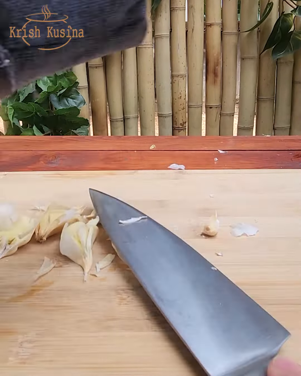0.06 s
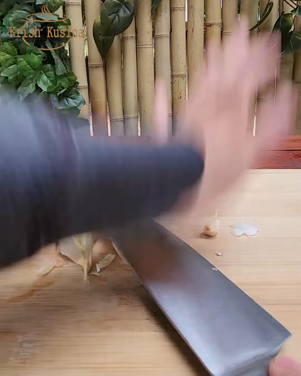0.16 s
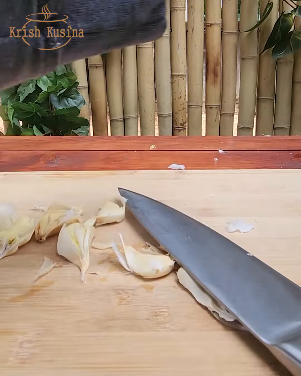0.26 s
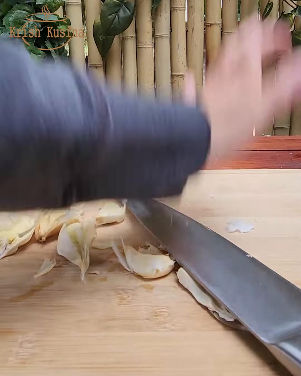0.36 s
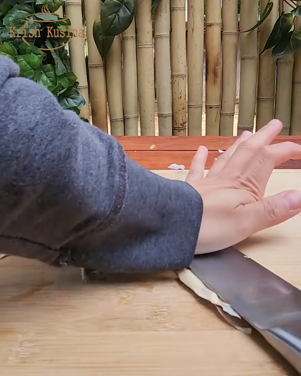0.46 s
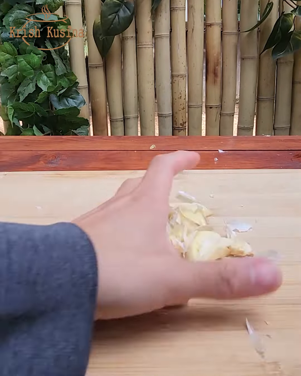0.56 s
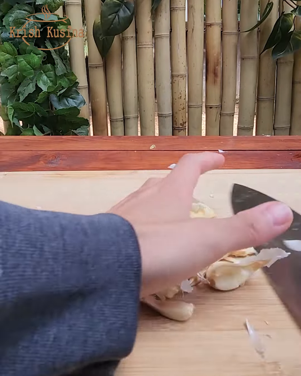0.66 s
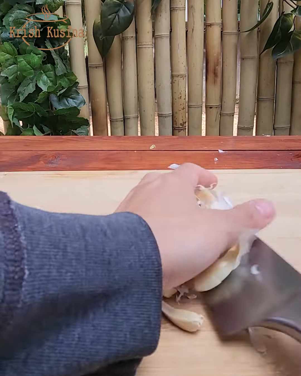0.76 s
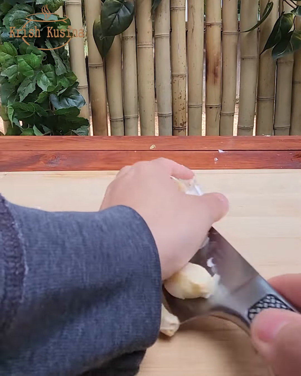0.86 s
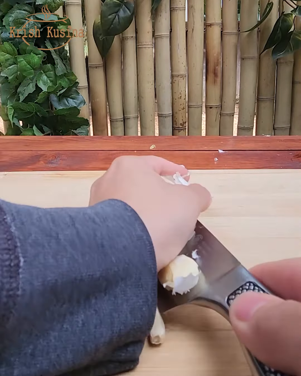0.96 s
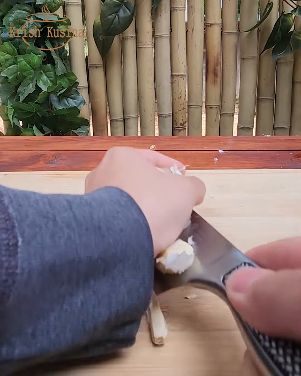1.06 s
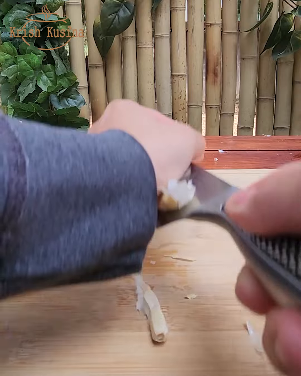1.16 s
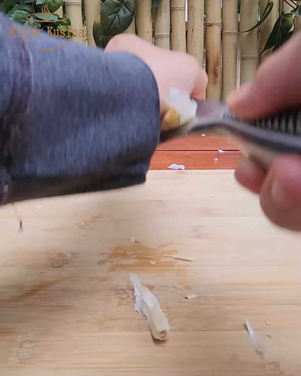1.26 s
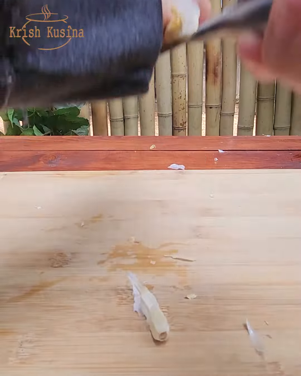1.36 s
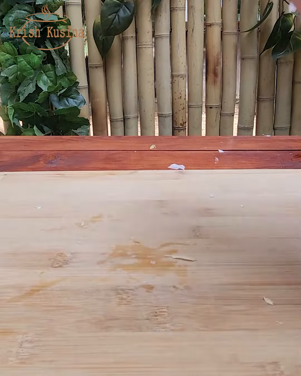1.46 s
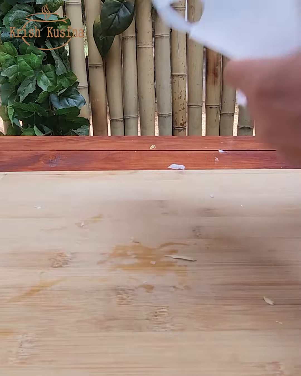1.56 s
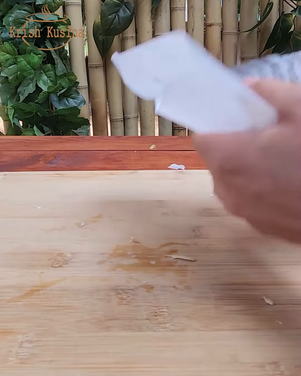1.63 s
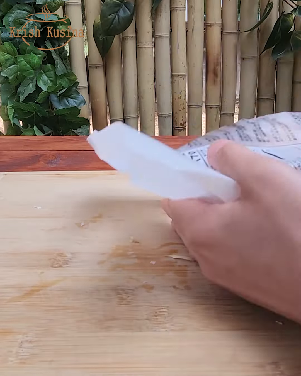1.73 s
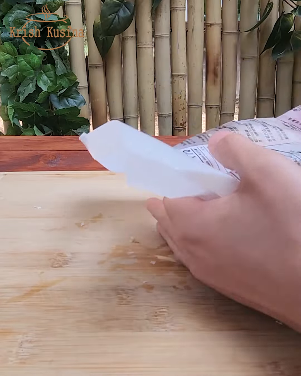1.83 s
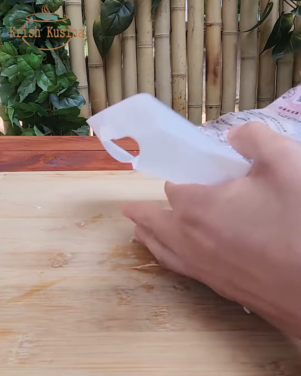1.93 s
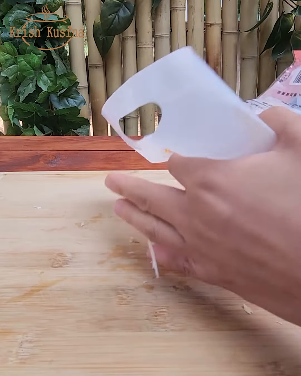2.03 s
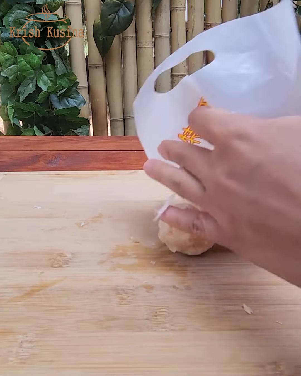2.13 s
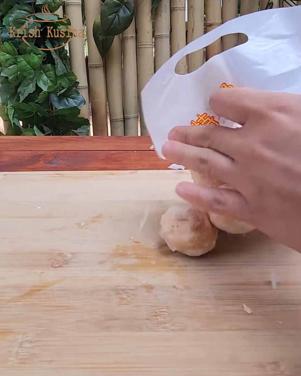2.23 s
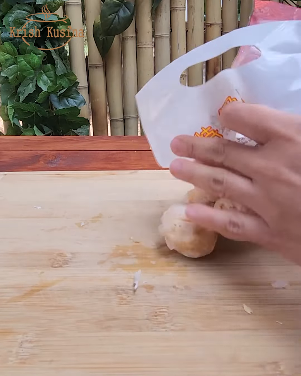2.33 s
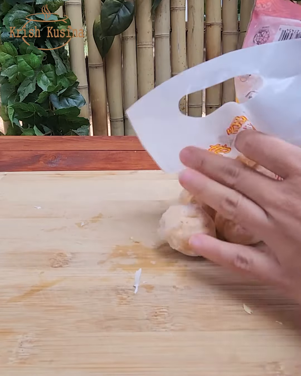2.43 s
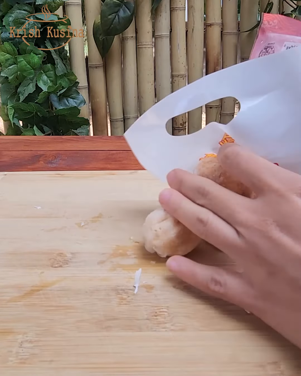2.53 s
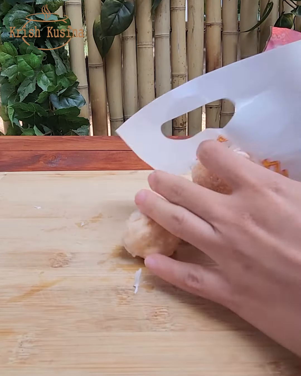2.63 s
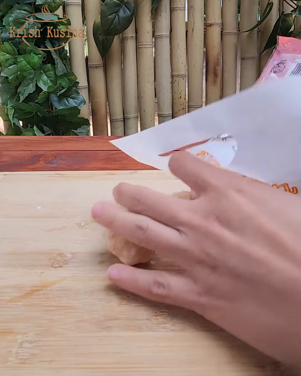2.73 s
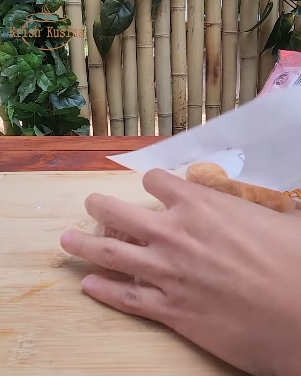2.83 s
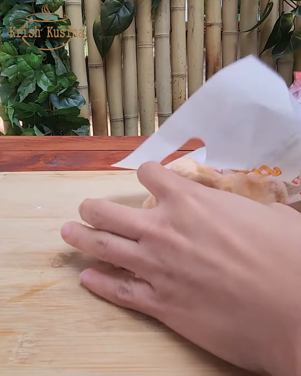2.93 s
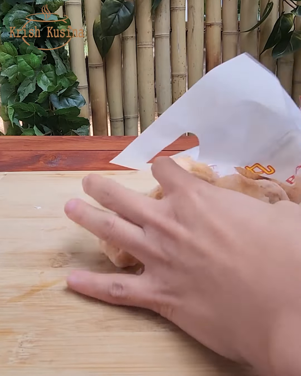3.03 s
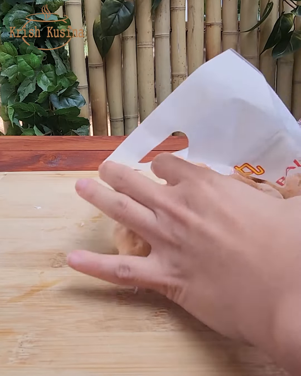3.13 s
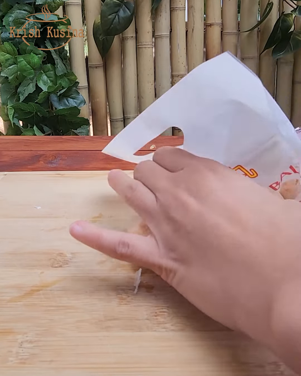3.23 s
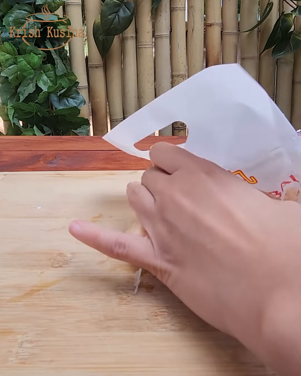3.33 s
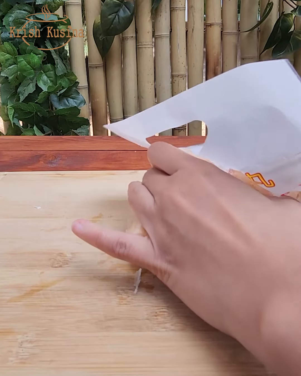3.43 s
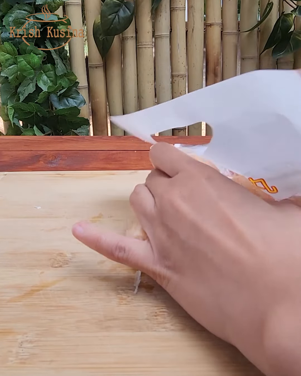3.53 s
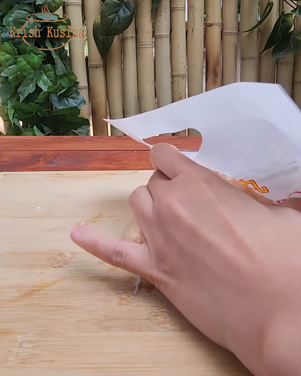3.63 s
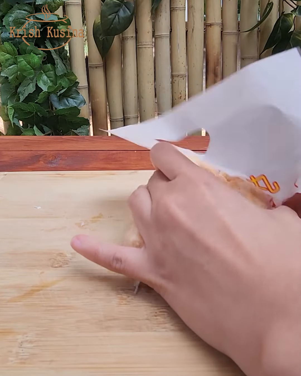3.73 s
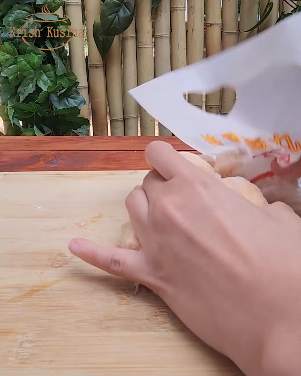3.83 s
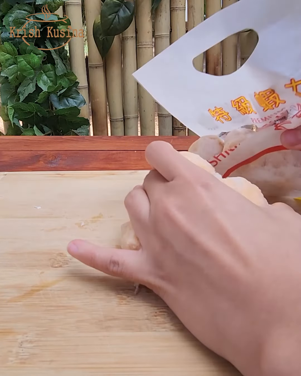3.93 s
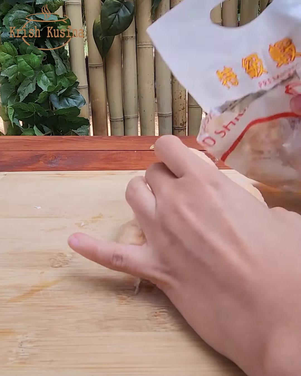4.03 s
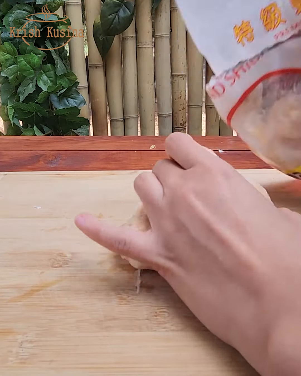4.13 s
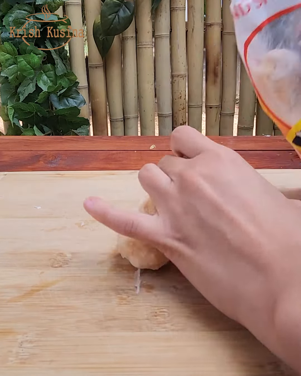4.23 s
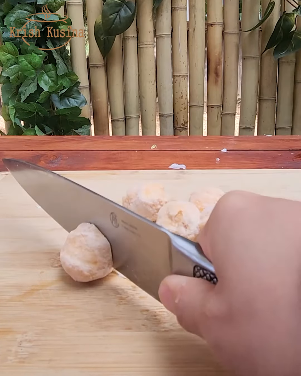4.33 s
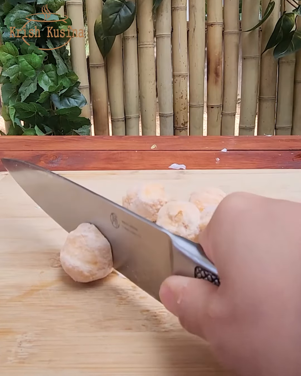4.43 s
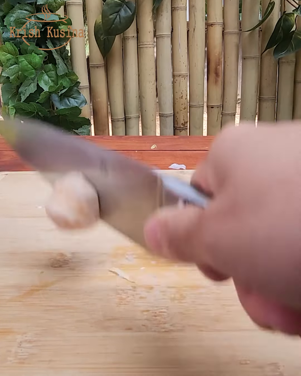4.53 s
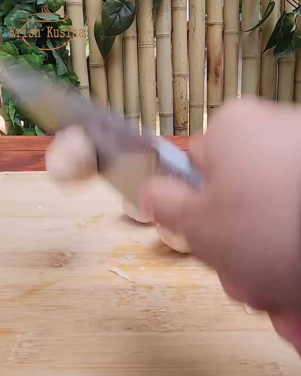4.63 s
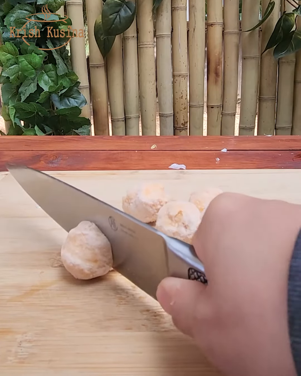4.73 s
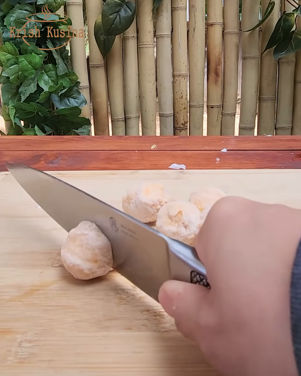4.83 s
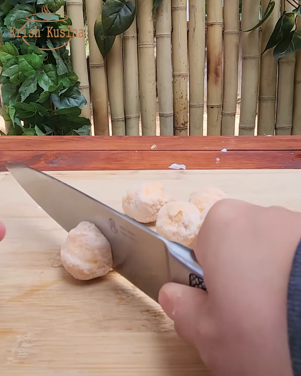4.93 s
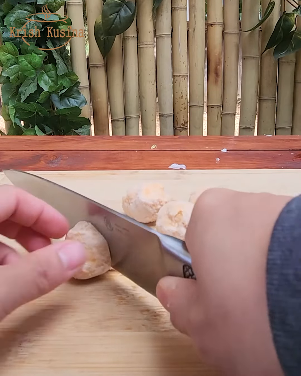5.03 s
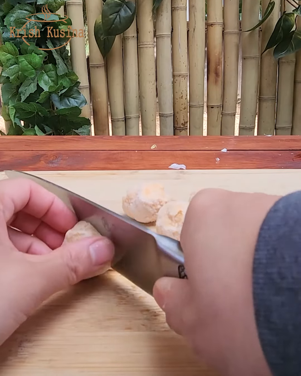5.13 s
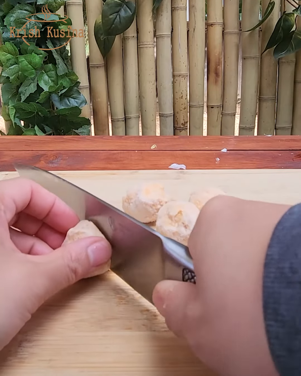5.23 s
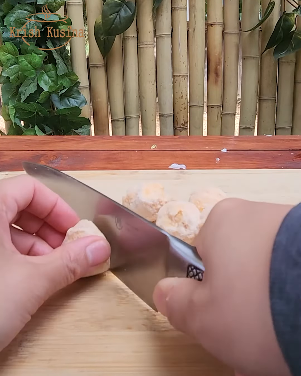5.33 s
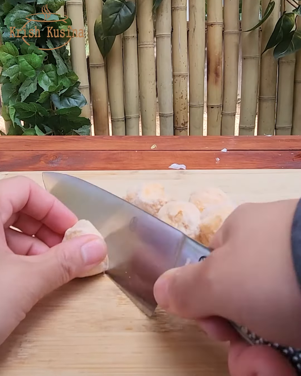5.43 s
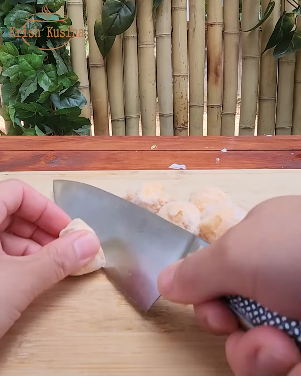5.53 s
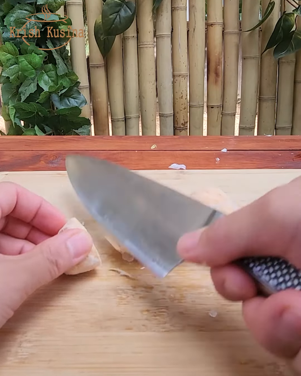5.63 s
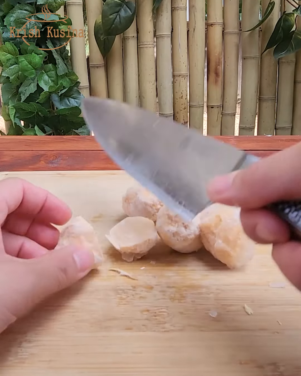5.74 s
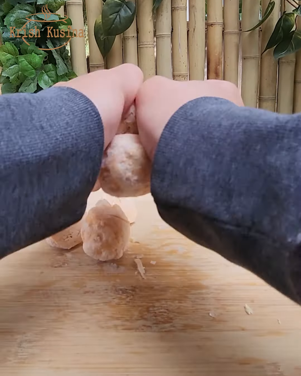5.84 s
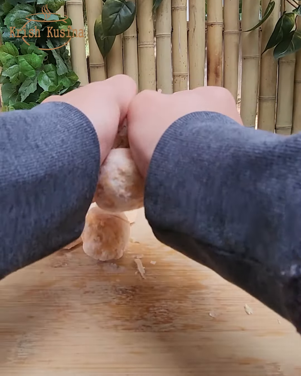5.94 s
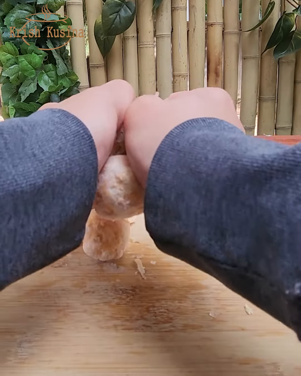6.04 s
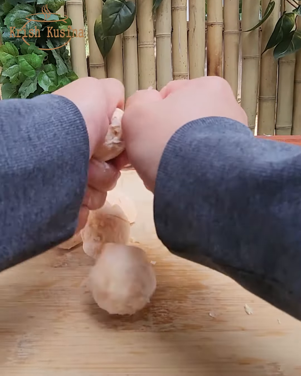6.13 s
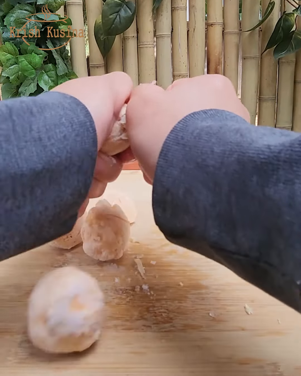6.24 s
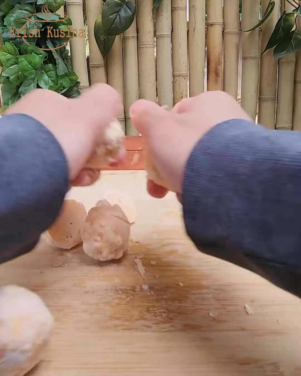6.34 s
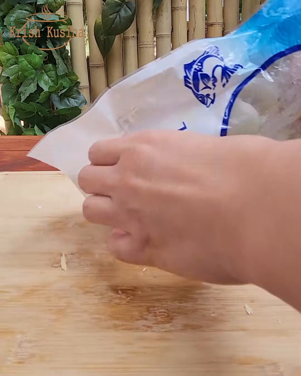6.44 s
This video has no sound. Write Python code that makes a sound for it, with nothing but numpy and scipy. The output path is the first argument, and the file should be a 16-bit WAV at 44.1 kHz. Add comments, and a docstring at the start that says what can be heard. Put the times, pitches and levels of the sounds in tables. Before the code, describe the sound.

Close-miked stereo in a small, dry kitchen, with faint room hum and low rumble. A brief crush opens the scene; at 0.2 s a hard knock cracks garlic on a wooden board with a deep table thud and gritty crunch, followed at 0.4 s by a second, pulpier smash that trails to 0.6 s. Dry, papery skins scrape unevenly with a hollow ring, fading by about 1.2 s. From 1.5 to 4.4 s a thin plastic bag crinkles in irregular swells and sharp single snaps, busiest near 1.7 and 3.75 s, with dull tumbling bumps around 2.4, 4.0 and 4.35 s. It stops abruptly and the rumble drops. A bright chop lands at 4.7 s with light brushing; a faint cut follows at 5.4 s. A steady hiss enters at 5.9 s, a small crack at 6.1, then a loud, dry knock at 6.15 and a lighter bump near 6.5.

```python
"""A knife knocks on a wooden board: blows ring the board's modes, and noise bursts crush and crack garlic.
Garlic is smashed twice and scraped up; its papery skins rustle as noise grains of hollow, ringing colour.
A crinkly plastic bag is shaken out in swelling noise grains and single snaps; mushrooms tumble out and
are chopped, heard as further blows and crushes. Short, filtered-noise reflections make a small, dry kitchen.
Under it lie room air with a low hum, a low rumble and, near the end, a steady hiss."""
import sys
import numpy as np
from scipy import signal
from scipy.fft import rfft, irfft
from scipy.io import wavfile
from scipy.ndimage import uniform_filter1d

SR = 44100
rng = np.random.default_rng(int(sys.argv[2]) if len(sys.argv) > 2 else 0)


def output_pcm(signal):
    """Save a mono or channel-first signal as 16-bit PCM at the path in sys.argv[1].

    Samples are clipped to [-1, 1] before scaling.
    """
    pcm = np.clip(np.atleast_2d(signal).T, -1, 1) * 32767
    wavfile.write(sys.argv[1], SR, np.round(pcm).astype(np.int16))


N = 286209
T = np.arange(N) / SR   # time axis [s]

# Levels are relative within each source; spectra are scaled to unit power.
# Blows on the board: t/s, level/dB, contact cut-off f/Hz, board ring level/dB, table thud level/dB
BLOWS = [(0.1909, -13, 1900, -32, -13.5), (0.2155, -22, 1500, -29, -100), (0.3748, -41.5, 900, -15, -100),
         (0.404, -22, 260, -31, -100), (0.4083, -43, 1500, -8, -20.5), (2.405, -26.5, 915, -28, -43),
         (4.0362, -32, 600, -37, -48), (4.3520, -26.5, 1500, -35, -40), (4.6842, -13, 3954, -33, -38.5),
         (5.4378, -32, 1450, -34, -63.5), (6.1511, -8.5, 2700, -42, -44), (6.273, -45.5, 430, -24, -58),
         (6.473, -31, 2120, -38, -39)]
# Modes of the board: f/Hz, level/dB, decay time T60/s
BOARD_MODES = [(397.8, -1.5, 0.11), (493, -1.5, 0.12), (557, -5, 0.044), (624, -10.5, 0.089),
               (817, -1, 0.062), (1012, -1, 0.041), (1270, 0, 0.071), (1740, 0, 0.056), (2050, -3, .12),
               (2364, -4.5, 0.1)]
# Spectrum of the knock: f/Hz, density level/dB (per Hz)
KNOCK_SPECTRUM = [(60, -9), (550, -6.5), (1200, -1.5), (1900, -1), (3000, -1), (16000, -8)]
# Crisp breaks of garlic skin and flesh: t/s, level/dB, length/s
CRACKS = [(0.188, -21, 0.0016), (0.19, -13, 0.0013), (0.4048, -17, 0.0055), (0.4078, -10, 0.0026),
          (0.882, -39.5, 0.0017), (5.003, -57, 0.002), (6.082, -23, 0.0015)]
# Blade crushing a clove or mushroom: start t/s, end t/s, level/dB, fall/(dB/s), treble tilt/(dB/octave)
SMASHES = [(0.0, 0.059, -25.5, 345, -0.1), (0.189, 0.245, -17, 95, -1.1), (0.241, 0.288, -19, 398, -0.5),
           (0.414, 0.471, -27, 75, 0.2), (0.467, 0.6, -31, 292, -0.5), (5.416, 5.435, -45, 120, -1.2)]
# Spectrum of the crushed pulp: f/Hz, density level/dB (per Hz)
PULP_SPECTRUM = [(59, -22), (100, -7.5), (330, -4.5), (570, -4.5), (736, -11), (1700, -15.5), (3700, -16.5),
                 (11900, -24.5), (16000, -24)]
# Resonances of the blade: f/Hz, width/Hz, level/dB
BLADE_RESONANCES = [(555, 40, -1.5), (950, 53, 10), (1847, 86, 8.5), (3420, 250, -1.5), (5500, 200, 2.5)]
# Uneven push of the scraped skins: t/s, level/dB
SCRAPE_PUSH = [(0.584, -37.5), (0.612, -33.5), (0.66, -38), (0.757, -34.5), (0.82, -41.5), (0.93, -49.5),
               (0.98, -58), (1.199, -72.5)]
# Fingers, sleeve and blade brushing over the food: t/s at the height, level/dB, build-up and release/s
BRUSHES = [(1.43, -67.5, 0.058), (4.718, -42.5, .06), (5.13, -66.5, 0.041), (5.393, -59, 0.091),
           (5.508, -59, 0.022), (5.791, -61, 0.19), (6.464, -43, 0.031)]
# Spectrum of the dry skins: f/Hz, density level/dB (per Hz)
SKIN_SPECTRUM = [(250, -15), (500, -4), (780, -22), (1050, -5.5), (2400, -5), (4400, -7.5), (6200, -1.5),
                 (9000, -8.5), (16000, -1.5)]
# Peaks that give the rustle a hollow, ringing colour: f/Hz, level/dB
RUSTLE_PEAKS = [(500, 8), (1050, 6), (1660, 13), (2380, 12), (2830, 10), (3260, 10), (3750, 10), (5560, 8)]
# Tugs and shakes of the bag: t/s at the height, crinkle level/dB, build-up/s, release/s,
# treble level/dB (higher when the film is taut)
TUGS = [(1.555, -34.5, .14, 0.12, 1.5), (1.685, -24, 0.096, 0.21, -3.5), (1.796, -21, 0.23, 0.041, -9.5),
        (2.011, -27.5, 0.18, .13, -4.5), (2.245, -33.5, 0.24, 0.049, -1), (2.409, -31, 0.21, 0.063, -2),
        (2.499, -29, 0.11, 0.68, -4), (2.73, -32, 0.38, 0.42, -2), (2.94, -36.5, 0.1, 0.059, -5),
        (3.23, -37, 0.095, 0.076, 2), (3.336, -32, 0.07, 0.17, -4.5), (3.436, -30, .12, 0.048, -19),
        (3.514, -36, .008, 0.086, 0.5), (3.603, -32, 0.011, 0.062, -8), (3.72, -25, .13, 0.22, -7.5),
        (3.796, -26, 0.1, 0.12, -3.5), (4.076, -28.5, 0.27, 0.096, -8), (4.178, -23.5, 0.12, 0.18, -6),
        (4.354, -26.5, 0.018, 0.14, -7)]
# Big creases of the bag snapping through: t/s, level/dB
SNAPS = [(1.5554, -20), (1.6734, -21), (1.6861, -19), (1.7153, -21), (1.7907, -15.5), (2.008, -25.5),
         (2.0449, -21), (2.2371, -22), (2.298, -28), (2.3434, -31), (2.3794, -24.5), (2.4069, -19.5),
         (2.4958, -22.5), (2.7357, -18.5), (2.772, -31), (3.0398, -32), (3.2251, -19), (3.299, -32),
         (3.327, -26), (3.3569, -22), (3.4325, -20.5), (3.512, -26), (3.5217, -24.5), (3.548, -22.5),
         (3.6737, -26), (3.7097, -20.5), (3.7414, -19.5), (3.7549, -16.5), (3.7704, -34), (3.846, -19.5),
         (3.8664, -22.5), (3.95, -21.5), (3.9676, -19.5), (4.129, -28), (4.3773, -25)]
# Spectrum of the plastic film: f/Hz, density level/dB (per Hz)
FILM_SPECTRUM = [(59, -35), (100, -4.5), (415, -1.5), (595, -5), (970, 0), (1870, 0), (2370, -3.5),
                 (2990, -1.5), (7140, -7.5), (10900, -13), (11900, -10), (15000, -10.5), (16000, -19)]
# Papery note of the crumpled film: f/Hz, width/Hz, level/dB
FILM_RESONANCE = [(2110, 494, 3)]
# Brief dips in the level of all sources but the background: from t/s, until t/s
DIPS = [(0.287, 0.372), (4.394, 4.65)]
# Spectrum of the still room: f/Hz, density level/dB (per Hz)
AIR_SPECTRUM = [(20, -18.5), (50, -2), (90, -6.5), (135, -2), (210, -15.5), (350, -19.5), (800, -20.5),
                (2000, -34.5), (5000, -52), (16000, -50)]
# Low hum as a peak in the room air: f/Hz, width/Hz, level/dB
HUM_RESONANCE = [(131, 18, 9)]
# Spectrum of the low rumble: f/Hz, density level/dB (per Hz)
RUMBLE_SPECTRUM = [(20, -23.5), (45, 6), (80, -3), (130, -12), (250, -17.5), (800, -47.5)]
# Spectrum of the late hiss: f/Hz, density level/dB (per Hz)
HISS_SPECTRUM = [(60, -19), (140, -4.5), (300, -8.5), (900, -13.5), (1400, -21), (3500, -18), (5600, -14),
                 (9100, -20), (16000, -15.5)]
# Peaks in the late hiss: f/Hz, width/Hz, level/dB
HISS_PEAKS = [(500, 32, 7), (672, 32, 11)]

RUSTLE_PEAK_WIDTH_HZ = 110
WAVER_SHARE, WAVERS_PER_S = .02, 9   # the ringing pitches waver by up to this share
SWELL_RANGE_DB = 21.5   # a stroke rises this much over its build-up and sinks as much over its release
BAG_FROM_S, BAG_UNTIL_S = 1.487, 4.393   # the bag is in the hand
HELD_DB, HELD_TREBLE_DB = -69.5, -8.5   # its crinkle between tugs, and the treble relative to that
CRINKLE_SPREAD_DB, CRINKLE_BED_DB = 4, -7.5   # size spread of the buckles; film rubbing under them
FACET_DB, FACET_T60_S = -20, 0.0042   # drive and decay of a snapped facet's ring
FACET_HZ, FACET_SPREAD_OCTAVES = 2050, .6   # facets differ in size
DIP_DB = -14
EARLY_T60_S, EARLY_SPLIT_HZ = 0.14, 2040   # early decay of the kitchen below the split
TREBLE_DIES_FASTER = 1.2   # ratio of the early decay rate above the split to that below
LATE_DB, LATE_T60_S, LATE_CUT_HZ = -28.5, .52, 3400   # late tail of the kitchen
AIR_DB = -58
# a low rumble is stronger up to 4.39 s, then drops and rises again steadily
RUMBLE_DB, RUMBLE_DROPS_S, DROPPED_DB, RUMBLE_RISE_DB_PER_S = -49.5, 4.39, -70.5, 8.5
HISS_FROM_S, HISS_DB = 5.888, -47
CUTOFF_HZ = 16000


def blows(chatter_s=0.0055, chatter_db=-15, tick_db=-33, thud_hz=80, thud_t60=0.16):
    """Impact excitation: each blow knocks, chatters and rings the board; the table under it thuds."""
    out, t = np.zeros((2, N)), T[:SR // 2]
    click = np.tile(t == 0, (2, 1)) * 1.
    thud = pan(ring(click, thud_hz, thud_t60), left_db=9.5)
    for s, level_db, contact_hz, ring_db, thud_db in BLOWS:
        chatter = amp(chatter_db) * noise(0, size=len(t)) * np.exp(-t / chatter_s)
        body = colour(click + chatter, KNOCK_SPECTRUM) + amp(ring_db) * board(click)
        body = cut(body, contact_hz, order=4) + amp(tick_db) * body   # a soft contact is a dull one
        body = body / np.sqrt(np.mean(body[:, t < .005] ** 2))   # unit rms at the onset
        add(out, s, amp(level_db) * body + amp(thud_db) * thud)
    return kitchen(out, wet_db=-3.0, wall_hz=7000)


def board(x):
    """Modal superposition: decaying sines, each excited a little differently from spot to spot."""
    spots_db = rng.uniform(-2, 2, len(BOARD_MODES))
    out = 0
    for k, (hz, db, t60) in enumerate(BOARD_MODES):
        sign = (-1) ** k
        out = out + sign * amp(db + spots_db[k]) * ring(x, hz, t60)
    return out


def smashes(board_db=-9):
    """Crushing fracture: dense crunches of the pulp ring the board while the blade buzzes against it."""
    crunch = grains(per_s=400, spread_db=2.0, colour_db=0.5, grain_s=0.0064, bed_db=1, even_s=0.034)
    wood = amp(board_db) * rms_one(board(crunch))
    out = np.zeros((2, N))
    for start, end, db, fall, tilt_db in SMASHES:
        pressure = amp(db - fall * np.maximum(T - start, 0)) * during(start, end)
        pulp = rms_one(colour(crunch, PULP_SPECTRUM, BLADE_RESONANCES, tilt_db))
        out += pressure * (pulp + wood)
    return pan(out, left_db=2.0)


def cracks():
    """Brittle fracture: skin and flesh give way in brief bursts of bright noise."""
    out = np.zeros((2, N))
    for s, db, length in CRACKS:
        t = T[:int(2 * length * SR) + 2]
        add(out, s, amp(db) * noise(.4, size=len(t)) * np.exp(-(t / length) ** 4))
    spectrum = [(200, -8.0), (2200, -4.0), (4400, 0.5), (9000, -6.0), (16000, -10.5)]   # f/Hz, level/dB
    return kitchen(colour(out, spectrum), wet_db=-4.5, wall_hz=7890)


def scrape(rustle_db=1):
    """Friction noise: dry skins rustle and tick in one uneven push, and in light brushes."""
    times, levels = np.transpose(SCRAPE_PUSH)
    push = amp(np.interp(T, times, levels)) * during(times[0], BAG_FROM_S)
    brushes = sum(swell(s, db, length, length) for s, db, length in BRUSHES)
    rustle = grains(per_s=170, spread_db=3.5, colour_db=5, grain_s=0.0009, bed_db=2, even_s=0.16)
    peaks = [(hz, RUSTLE_PEAK_WIDTH_HZ, db) for hz, db in RUSTLE_PEAKS]
    rustle = colour(rustle, SKIN_SPECTRUM, peaks)
    waver = np.interp(T * WAVERS_PER_S, np.arange(N), rng.uniform(-1, 1, N))
    warped = T + WAVER_SHARE * np.cumsum(waver) / SR   # a varying reading speed bends the pitch
    bent = np.array([np.interp(warped, T, side, period=N / SR) for side in rustle])
    return pan(bent, left_db=2.0) * amp(rustle_db) * (push + brushes)


def bag(split_hz=5000, crinkle_db=-1.7, treble_db=6, snap_s=.0013, snap_db=-1.5):
    """Buckling of a thin film: small buckles crinkle, sharper when taut; big creases snap singly."""
    body, treble = handling()
    held = during(BAG_FROM_S, BAG_UNTIL_S)
    crinkle = grains(per_s=430, spread_db=CRINKLE_SPREAD_DB, colour_db=8, grain_s=.0014,
                     bed_db=CRINKLE_BED_DB, even_s=.035)
    dull = cut(crinkle, split_hz, order=1)
    sharp = pan(crinkle - dull, left_db=0.5)
    film = held * amp(crinkle_db) * (body * dull + amp(treble_db) * treble * sharp)
    t = T[:SR // 150]
    for s, db in SNAPS:
        hz = FACET_HZ * 2 ** (FACET_SPREAD_OCTAVES * rng.uniform(-1, 1))
        # the crease runs through the film in a millisecond or so
        snap = noise(0.19, size=len(t)) * t * np.exp(-2 * t / snap_s)
        snap = snap + amp(FACET_DB) * ring(snap, hz, FACET_T60_S)   # each facet has a pitch of its own
        snap = snap / np.sqrt(np.mean(snap[:, t < .0015] ** 2))
        add(film, s - snap_s, amp(db + snap_db) * snap)
    heard = kitchen(colour(film, FILM_SPECTRUM, FILM_RESONANCE), wet_db=-5, wall_hz=9600)
    return pan(heard, left_db=3.0)


def handling():
    """Power addition: tugs add to the stir of the held bag, giving gains for crinkle and treble."""
    body, treble = amp(HELD_DB) ** 2, amp(HELD_DB + HELD_TREBLE_DB) ** 2
    for s, db, build_s, release_s, treble_db in TUGS:
        tug = swell(s, db, build_s, release_s)
        body = body + tug ** 2
        treble = treble + (tug * amp(treble_db)) ** 2
    return np.sqrt(body), np.sqrt(treble)


def swell(s, db, build_s, release_s):
    """Exponential envelope: a stroke of the hand builds to its height and lets go, evenly in dB."""
    away = np.maximum((s - T) / max(build_s, 1e-3), (T - s) / max(release_s, 1e-3))
    return amp(db - SWELL_RANGE_DB * np.minimum(away, 10))


def kitchen(x, wet_db, wall_hz):
    """Reverberant decay: dense reflections die fast, treble first; a faint, dull tail lingers."""
    t = T[:SR // 2]
    fade = amp(-60 * t / EARLY_T60_S) * (t > .002)
    scatter = noise(0, size=len(t))
    early_low = cut(scatter, EARLY_SPLIT_HZ, order=3) * fade
    early_high = cut(scatter, EARLY_SPLIT_HZ, "high", order=3) * fade ** TREBLE_DIES_FASTER
    late = amp(LATE_DB - 60 * t / LATE_T60_S) * cut(noise(0, size=len(t)), LATE_CUT_HZ)
    echoes = (early_low + early_high + late) / np.linalg.norm(fade)
    echoes = cut(cut(echoes, wall_hz, order=1), 130, "high", order=1)
    return x + amp(wet_db) * signal.fftconvolve(x, echoes, axes=1)[:, :N]


def background():
    """Filtered noise: room air with a low hum, a low rumble of varying level, a late hiss."""
    air = amp(AIR_DB) * colour(noise(1.0), AIR_SPECTRUM, HUM_RESONANCE)
    rising_db = DROPPED_DB + RUMBLE_RISE_DB_PER_S * (T - RUMBLE_DROPS_S)
    rumble_db = np.where(T < RUMBLE_DROPS_S, RUMBLE_DB, rising_db)
    rumble = pan(colour(amp(rumble_db) * noise(.9), RUMBLE_SPECTRUM), left_db=4.5)
    hiss = colour(noise(0.17), HISS_SPECTRUM, HISS_PEAKS)
    hiss = amp(HISS_DB) * during(HISS_FROM_S, np.inf) * hiss
    return air + rumble + pan(hiss, left_db=-1.0)


def grains(per_s, spread_db, colour_db, grain_s, bed_db, even_s):
    """Granular noise: random bursts of uneven size and colour on a fine rustle, evened in level."""
    struck = rng.random(N) < per_s / SR
    sizes = amp(spread_db * np.minimum(rng.exponential(1, N), 3)) * struck
    edges_hz = [30, 600, 1200, 2200, 3800, 6500, 11000, 19000]
    x = 0
    for band in zip(edges_hz, edges_hz[1:]):
        strength = sizes * amp(colour_db * rng.uniform(-1, 1, N))
        energy = signal.lfilter([1], [1, -np.exp(-2 / (grain_s * SR))], strength ** 2 + 1e-18)
        white = noise(.8 / (1 + band[0] / 1200))   # left and right agree most in the bass
        burst = white * np.sqrt(energy / energy.mean() + amp(bed_db) ** 2)
        x = x + signal.sosfilt(signal.butter(2, band, "band", fs=SR, output="sos"), burst)
    return x / np.sqrt(uniform_filter1d(np.mean(x ** 2, axis=0), int(even_s * SR)) + 1e-9)


def ring(x, hz, t60):
    """Damped resonator: a unit click sets a decaying sine of initial height 1 ringing."""
    r, w = amp(-60 / (t60 * SR)), 2 * np.pi * hz / SR
    return signal.lfilter([0, np.sin(w)], [1, -2 * r * np.cos(w), r * r], x + 1e-18)


def colour(x, spectrum, peaks=(), tilt_db=0, size=8192):
    """Minimum-phase filtering: unit power, a smooth spectrum, a tilt per octave and resonant peaks."""
    hz = np.maximum(np.fft.rfftfreq(size, 1 / SR), 1)
    knots, levels = np.transpose(spectrum)
    db = np.interp(np.log(hz), np.log(knots), levels) + tilt_db * np.log2(hz)
    for centre, width, gain in peaks:
        db = db + gain / (1 + (2 * (hz - centre) / width) ** 2)
    cepstrum = irfft(np.log(amp(db)))[:size // 2]   # the causal half sets the phase
    cepstrum[0] = 0
    response = irfft(np.exp(rfft(2 * cepstrum, size)))
    response = response / np.linalg.norm(response)
    return signal.fftconvolve(x, response[None], axes=1)[:, :x.shape[1]]


def cut(x, hz, kind="low", order=2):
    """Butterworth filtering: low- or high-pass."""
    return signal.sosfilt(signal.butter(order, min(hz, .45 * SR), kind, fs=SR, output="sos"), x + 1e-18)


def noise(alike, size=N):
    """Interchannel correlation: mid and side mix to stereo white noise with a given likeness."""
    mid, side = rng.standard_normal((2, size))
    alike = np.clip(alike, -1, 1)
    return (np.sqrt(1 + alike) * mid + np.sqrt(1 - alike) * side * [[1], [-1]]) / np.sqrt(2)


def pan(x, left_db):
    """Level difference between channels: left louder than right by so many dB."""
    return x * amp([[left_db / 2], [-left_db / 2]])


def amp(db):
    """Logarithmic level: decibels to amplitude gain."""
    return 10 ** (np.asarray(db) / 20)


def rms_one(x):
    """Power normalisation: scale to unit rms."""
    return x / np.sqrt(np.mean(x ** 2) + 1e-20)


def during(start, end):
    """Time gating: one between two times, with millisecond edges."""
    return np.clip((T - start) * 1000, 0, 1) * np.clip((end - T) * 1000, 0, 1)


def add(out, s, sound):
    """Superposition: mix a short sound in at a time."""
    at = max(round(s * SR), 0)
    out[:, at:at + sound.shape[1]] += sound[:, :N - at]


def scene():
    """Superposition of all sources in stereo; their level dips briefly, the background's does not."""
    dipped = sum(during(start, end) for start, end in DIPS)
    sources = blows() + cracks() + smashes() + scrape() + bag()
    return sources * amp(DIP_DB * dipped) + background()


def record(dry):
    """Band limiting and saturation: deepest bass lost, hardest peaks rounded, top cut."""
    rounded = 1.1 * np.tanh(cut(dry, 33, "high") / 1.1)
    return signal.sosfilt(signal.ellip(10, .1, 70, CUTOFF_HZ, fs=SR, output="sos"), rounded)


dry = scene()
out = record(dry)
output_pcm(out)
```